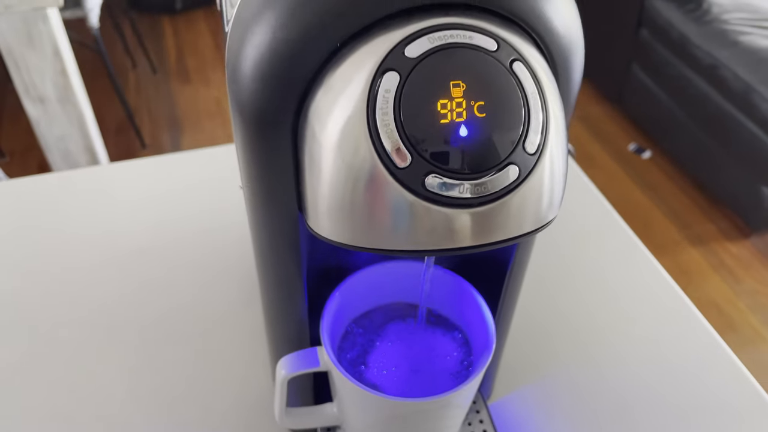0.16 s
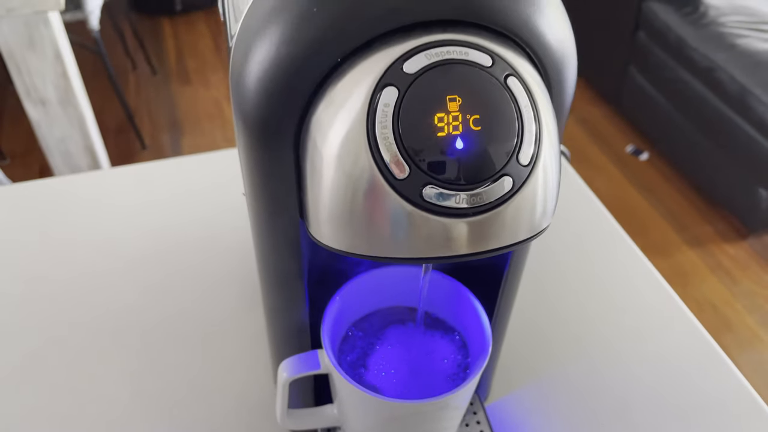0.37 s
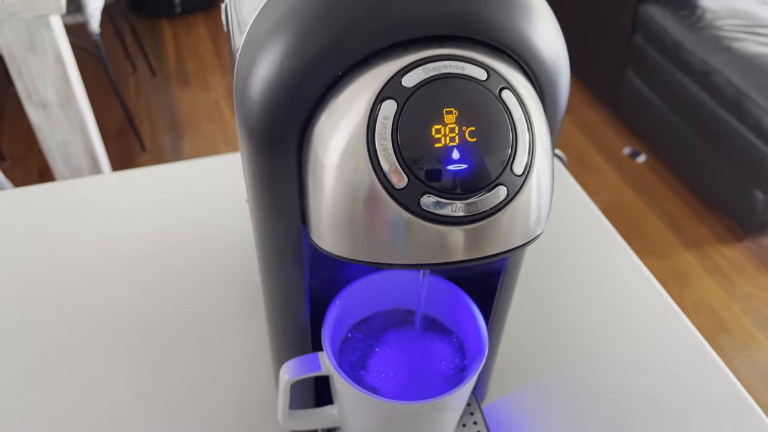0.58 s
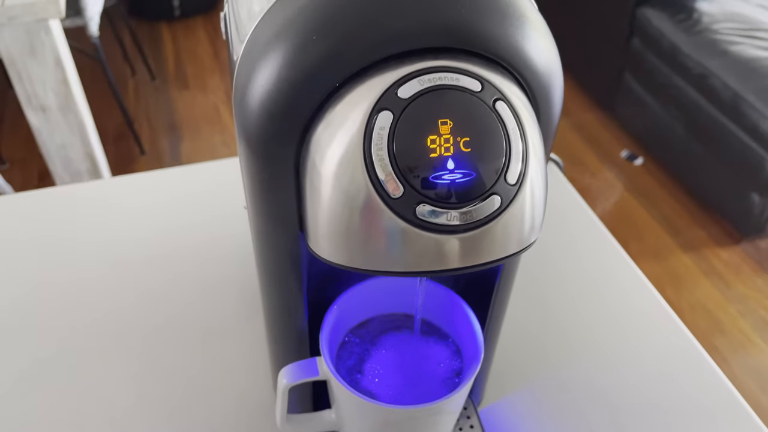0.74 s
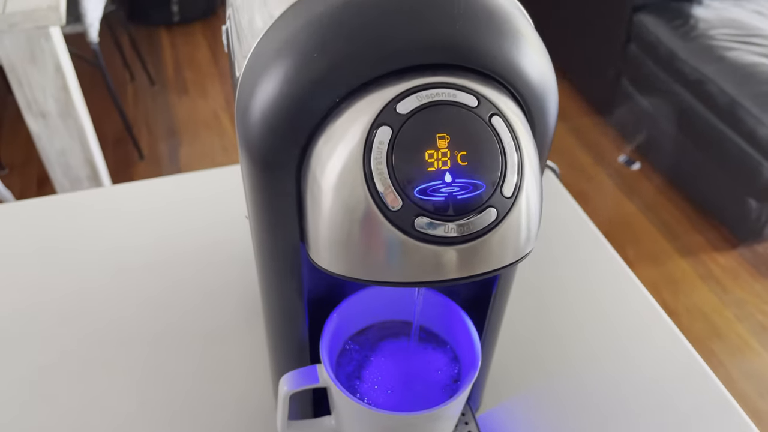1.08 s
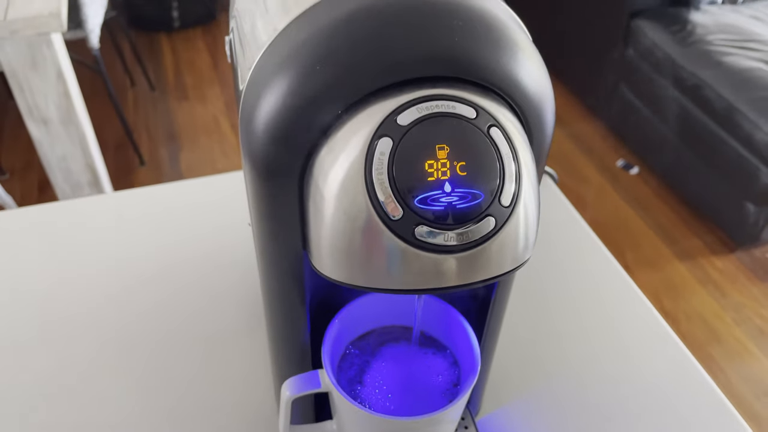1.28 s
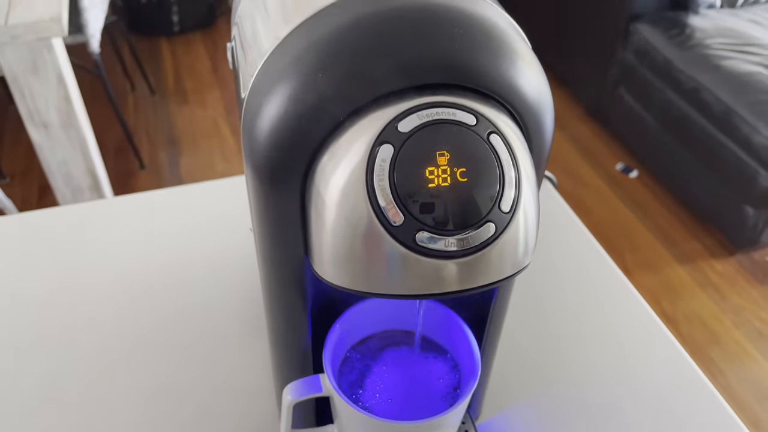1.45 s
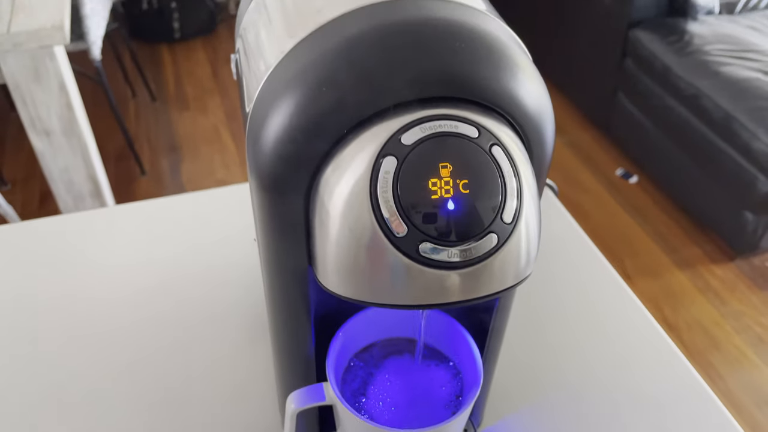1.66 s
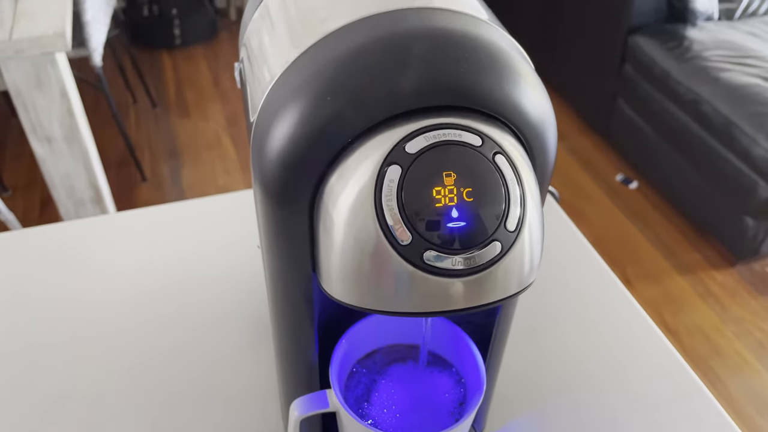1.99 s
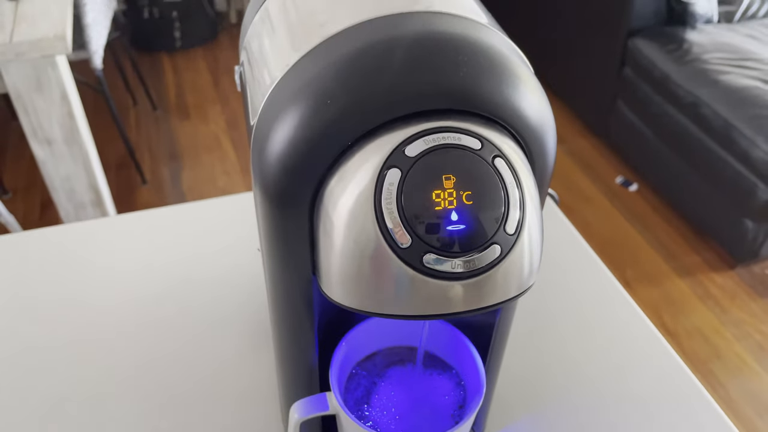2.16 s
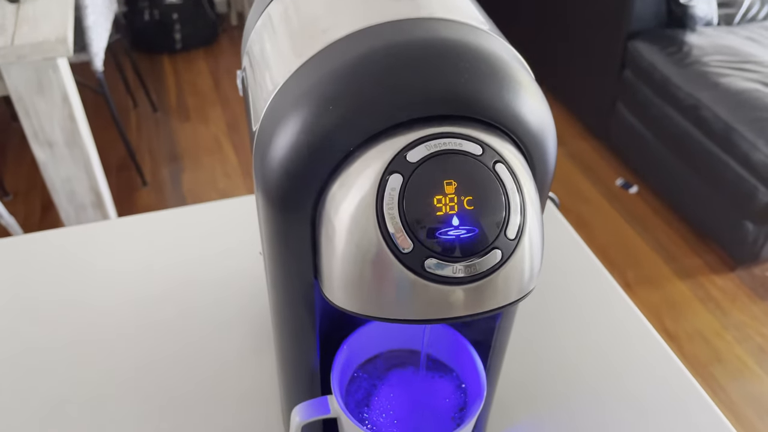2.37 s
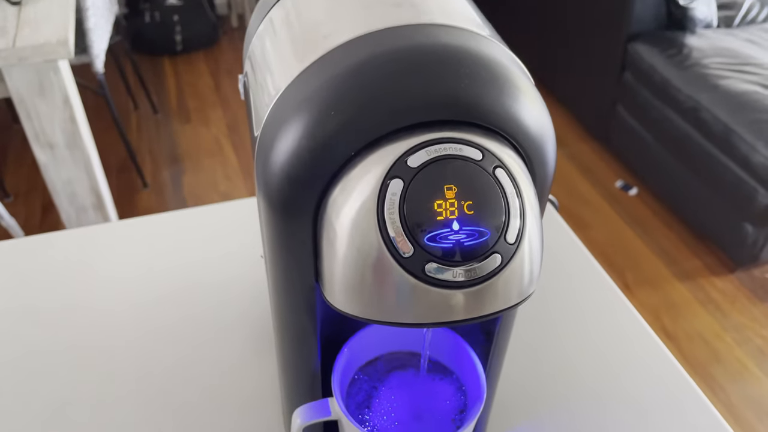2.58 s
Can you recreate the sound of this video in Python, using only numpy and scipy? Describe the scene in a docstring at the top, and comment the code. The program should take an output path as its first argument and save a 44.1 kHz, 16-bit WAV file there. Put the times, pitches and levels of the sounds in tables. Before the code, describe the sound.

A thin stream of hot water pours steadily into a part-filled mug, bubbling and gurgling with occasional hollow plops and crisp spits, over a low pump hum and heater rumble, close-miked in a small kitchen.

```python
"""A countertop dispenser pours a thin stream of hot water into a part-filled mug, close to the microphone.
From the start the heater rumbles, the stream rushes, the pump hums and swarms of tiny bubbles gurgle,
surging most near 0.2 s. Bubbles ring, plops sink in pitch and the spout spits sharp bursts of noise.
The heaviest plops fall near 0.65 and 0.72 s, as the pump hum is about to rise for half a second, and near
2.53 s. A small kitchen answers the bubbles and plops faintly with a short, diffuse tail."""
import sys
import numpy as np
from scipy import signal
from scipy.fft import rfft, irfft
from scipy.io import wavfile
from scipy.ndimage import uniform_filter1d

SR = 44100
rng = np.random.default_rng(int(sys.argv[2]) if len(sys.argv) > 2 else 0)


def store_wav(level_fs):
    """Save 16-bit WAV to argv[1]."""
    pcm = np.round(np.clip(np.atleast_2d(level_fs), -1, 1) * 32767)
    wavfile.write(sys.argv[1], SR, pcm.T.astype(np.int16))


N = 120834


def amp(db):
    """Decibels to gain."""
    return 10 ** (np.asarray(db) / 20)


def unit(x):
    """Scales to rms 1."""
    return x / np.sqrt(np.mean(x ** 2) + 1e-20)


def read(points, hz):
    """Reads a table along a log-frequency axis."""
    f, value = np.transpose(points)
    return np.interp(np.log(hz + 1), np.log(f + 1), value)


def over_time(points):
    """Draws a (seconds, value) table as a curve over the whole scene."""
    return np.interp(np.arange(N) / SR, *np.transpose(points))


def add(mix, s, sound):
    """Mixes a sound in at time s."""
    part = mix[max(round(s * SR), 0):][:len(sound)]
    part += sound[:len(part)]


def drift(rate_hz):
    """Random motion of rms 1, mostly slower than rate_hz."""
    hz = np.fft.rfftfreq(N, 1 / SR)
    spectrum = rfft(rng.standard_normal(N)) / (1 + (hz / rate_hz) ** 4)
    return unit(irfft(spectrum, N))


def band(noise, centre_hz, octaves):
    """Keeps a bell-shaped band of the noise, at rms 1."""
    hz = np.fft.rfftfreq(len(noise), 1 / SR)
    bell = np.exp(-.5 * (np.log2((hz + 1) / centre_hz) / octaves) ** 2)
    return unit(irfft(rfft(noise) * bell, len(noise)))


# Colour of heater rumble and stream rush. Each row: frequency in Hz, relative spectral level in dB.
RUSH_COLOUR = [(20, -30), (60, -1), (140, -3.5), (250, -1.5), (425, -11), (540, -10.5), (700, -15.5),
               (1000, -13), (1400, -20), (2100, -22.5), (3700, -30.5), (4650, -43), (5100, -37),
               (5900, -42), (7300, -35), (8200, -34.5), (10300, -44), (12500, -53), (16000, -45)]
# Resonances of the casing and the mug. Each row: frequency in Hz, width in Hz, boost in dB.
RESONANCES = [(498.4, 29, 11.5), (855, 27.4, 10.5), (1535, 54, 8), (1904, 27, 6.5), (2093, 24, 8.5)]
# How alike the rush is at the two microphone ports. Each row: frequency in Hz, likeness (1 is identical).
PORT_LIKENESS = [(60, 0.97), (300, .95), (700, 0.72), (1050, 0.66), (1800, 0.41), (3000, 0.64), (7000, 1),
                 (8200, 0.98)]
# Vigour of the gurgle, which the rush partly follows. Each row: time in seconds, level in dB.
VIGOUR = [(0, -2), (.21, 7.5), (.42, -2), (.75, 5.5), (1.15, 4), (1.55, 3.5), (2.35, 2.5), (2.74, 1.5)]
RUSH_DB, PATCH_DB, FLICKER_DB = -42.5, 1.55, 1.36
FLICKER_ABOVE_HZ, RUSH_FOLLOWS = 1750, 0.22  # RUSH_FOLLOWS: share of the vigour in dB


def rush():
    """Simmering rumble and the patchy rush of the stream, coloured by the casing and the mug."""
    frames, hz = N // 512 + 6, np.fft.rfftfreq(2048, 1 / SR)
    a, b, c, d, patches = rng.standard_normal(size=(5, frames, len(hz)))
    patches = uniform_filter1d(patches, size=4, axis=0)
    patches = unit(uniform_filter1d(patches, size=24, axis=1))
    likeness = np.clip(read(PORT_LIKENESS, hz), -1, 1)
    left = a + 1j * b
    right = likeness * left + np.sqrt(1 - likeness ** 2) * (c + 1j * d)
    grains = np.array([left, right]) * amp(PATCH_DB * patches)
    noise = signal.istft(grains.transpose(0, 2, 1), nperseg=2048, noverlap=1536)[1][:, :N]

    hz = np.fft.rfftfreq(N, 1 / SR)
    boosts_db = sum(db / (1 + (2 * (hz - f) / width) ** 2) for f, width, db in RESONANCES)
    spectrum = rfft(noise) * amp(read(RUSH_COLOUR, hz) + boosts_db)
    whole = irfft(spectrum, N)
    low = irfft(spectrum / (1 + (hz / FLICKER_ABOVE_HZ) ** 4), N)
    # Only the treble flickers and follows the vigour
    treble_db = RUSH_FOLLOWS * over_time(VIGOUR) + FLICKER_DB * drift(rate_hz=76)
    return amp(RUSH_DB) * unit(low + (whole - low) * amp(treble_db))


# Pump motor. Each row: time in seconds, speed in Hz before the waver, level in dB before the flutter.
PUMP = [(0, 63.58, -40), (.69, 63.33, -40), (0.831, 65.82, -38.5), (1.25, 65.56, -38.5),
        (1.43, 63.73, -39.5), (1.66, 62.86, -42.5), (2.1, 63.7, -39.5), (2.5, 63.5, -39.5)]
# Motor hum and gear tones. Each row: multiple of the pump speed, relative level in dB.
PUMP_ORDERS = [(1, -1), (1.6, -18), (2.15, -13.5), (4.4, -18.5)]
PUMP_WAVER, PUMP_FLUTTER_DB = 0.0176, 0.8  # waver: rms share of the speed


def pump():
    """A low motor hum with weak gear tones, all following the pump's speed."""
    s, hz, db = np.transpose(PUMP)
    t = np.arange(N) / SR
    speed_hz = np.interp(t, s, hz) * (1 + PUMP_WAVER * drift(rate_hz=14.2))
    turns = np.cumsum(speed_hz) / SR
    hum = sum(amp(order_db) * np.sin(2 * np.pi * (multiple * turns + rng.random()))
              for multiple, order_db in PUMP_ORDERS)
    level_db = np.interp(t, s, db) + PUMP_FLUTTER_DB * drift(rate_hz=4.2)
    return np.sqrt(2) * amp(level_db) * hum


BUBBLE_RISE_S, BUBBLE_SHAPE = .0005, 2.2  # a shape above 1 holds the ring, then drops it
POP_DB, POP_OCTAVES, POP_PER_RING = -8, 0.69, 0.79  # pop decay as a share of the ring time


def bubble(hz, ring_s, pop_hz, pop_db, noise):
    """Trapped air pinches off with a splashy pop and rings for a few cycles; hz may be a curve."""
    t = np.arange(len(noise)) / SR
    cycles = np.cumsum(hz * np.ones(len(t))) / SR
    tone = np.exp(-(t / ring_s) ** BUBBLE_SHAPE) * np.sin(2 * np.pi * cycles)
    pop = band(noise, pop_hz, POP_OCTAVES) * np.exp(-t / (POP_PER_RING * ring_s))
    return (1 - np.exp(-t / BUBBLE_RISE_S)) * (tone + amp(pop_db) * pop)


# Swarms of faint bubbles. Each row: bubbles per second, middle pitch in Hz, widest pitch spread either way
# in octaves, ring in seconds, level in dB of the faintest bubble before the vigour.
SWARMS = [(29.94, 242.2, 0.44, 0.016, -52), (69.97, 1042, 0.14, 0.0058, -56.5),
          (85, 1900, 0.33, 0.0032, -59), (89.6, 4450, .35, 0.0014, -60)]
SWARM_SPREAD_DB, SWARM_CAP = 3.3, 2.3  # mean extra level before the cap; the cap as a multiple of it
CLUSTER_DB, CLUSTER_HZ = 2.5, 9


def gurgle():
    """Swarms of faint bubbles, low simmer to fine fizz, in loose clusters that follow the stream's vigour."""
    out = np.zeros(N)
    for per_s, hz, octaves, ring_s, db in SWARMS:
        draws, noises = rng.random(size=(400, 3)), rng.standard_normal(size=(400, 2048))
        times = np.cumsum(-np.log(draws[:, 0])) / per_s
        extra_db = SWARM_SPREAD_DB * np.minimum(-np.log(draws[:, 1]), SWARM_CAP)
        spread = np.log(draws[:, 2] / (1 - draws[:, 2])).clip(-2, 2) / 2
        pitches = hz * 2 ** (octaves * spread)
        for s, size_db, pitch, noise in zip(times, extra_db, pitches, noises):
            if s < N / SR:
                add(out, s, amp(db + size_db) * bubble(pitch, ring_s, pitch, POP_DB, noise))
    clusters_db = CLUSTER_DB * np.tanh(drift(CLUSTER_HZ))
    return out * amp(over_time(VIGOUR) + clusters_db)


# Small bubbles and droplet ticks. Each row: start in seconds, ring level in dB, pitch in Hz.
BUBBLES = [(.041, -42.5, 4346), (.111, -37.5, 3530), (0.26, -49, 4100), (.275, -50, 4950),
           (.502, -47, 5360), (.645, -43, 4140), (0.6676, -37.5, 3270), (.6666, -34, 4480),
           (0.6667, -33, 6520), (.727, -39.5, 635), (.868, -48, 5000), (0.919, -35, 2070),
           (.933, -38, 2050), (1.0543, -45, 4250), (1.3125, -46, 5138), (1.3478, -39.5, 5000),
           (1.365, -35.5, 1890), (1.6394, -33.5, 5260), (1.7764, -41, 3260), (2.2126, -35, 3810),
           (2.215, -43, 5080), (2.2367, -34, 5170), (2.26, -37.5, 2090), (2.675, -41.5, 5400)]
BUBBLE_CYCLES = 8.5  # ring time in cycles of the pitch


def small_bubbles():
    """Small single bubbles that die the sooner the higher they ring."""
    out = np.zeros(N)
    for s, db, hz in BUBBLES:
        noise = rng.standard_normal(2048)
        add(out, s, amp(db) * bubble(hz, BUBBLE_CYCLES / hz, hz, POP_DB, noise))
    return out


# Plops of the stream plunging into the mug. Each row: start in seconds, ring level in dB, ring in seconds.
PLOPS = [(0.113, -31.5, 0.0028), (0.1736, -34, 0.01), (.196, -41.5, .006), (0.6455, -22.5, 0.0054),
         (.662, -36, .016), (.7242, -25, 0.0067), (0.7554, -31, 0.0079), (.9488, -32.5, 0.01),
         (0.971, -38, 0.0085), (1.084, -34.5, 0.003), (1.159, -35.5, 0.0042), (1.187, -36.5, 0.0057),
         (1.7635, -36.5, .0042), (2.2373, -33, 0.0044), (2.258, -38, 0.0073), (2.368, -37.5, 0.0045),
         (2.4526, -35.5, 0.0051), (2.5298, -24.5, 0.0037), (2.542, -37.5, 0.0046)]
PLOP_START_HZ, PLOP_END_HZ, PLOP_SINK_S = 1190, 961, 0.0033  # end pitch is for a plop of average dB
PLOP_DEEPER_HZ_PER_DB = 13.5
PLOP_SPLASH_HZ, PLOP_SPLASH_DB = 1290, -17  # splash relative to the ring


def plops():
    """Each plop sinks in pitch as its cavity deepens, the strong ones furthest."""
    out, t = np.zeros(N), np.arange(2048) / SR
    usual_db = np.mean(PLOPS, axis=0)[1]
    for s, db, ring_s in PLOPS:
        end_hz = PLOP_END_HZ - PLOP_DEEPER_HZ_PER_DB * (db - usual_db)
        sinking_hz = end_hz + (PLOP_START_HZ - end_hz) * np.exp(-t / PLOP_SINK_S)
        noise = rng.standard_normal(len(t))
        add(out, s, amp(db) * bubble(sinking_hz, ring_s, PLOP_SPLASH_HZ, PLOP_SPLASH_DB, noise))
    return out


# Spits of spray. Each row: start in seconds, level in dB, brightest frequency in Hz.
SPITS = [(.135, -43.5, 8700), (.614, -41, 5700), (.646, -38, 9300), (0.6662, -41, 5850), (.686, -47, 4940),
         (0.723, -46.5, 13000), (0.9188, -40.5, 8740), (1.126, -45.5, 6900), (1.601, -40, 7240),
         (1.6394, -41.5, 4700), (1.729, -42, 10600), (1.855, -46.5, 8740), (2.2124, -39.5, 4500),
         (2.2347, -35.5, 10500), (2.258, -45, 12000), (2.343, -50.5, 11800), (2.3675, -48.5, 11310),
         (2.5295, -47, 6100)]
SPIT_RISE_S, SPIT_DECAY_S, SPIT_OCTAVES = 0.00033, 0.0012, 0.48
SPIT_ECHO_S, SPIT_ECHO_DB = .0019, -15


def spits():
    """Each spit is a very short bright burst, thrown back once by the dispenser's recess."""
    out, t = np.zeros(N), np.arange(512) / SR
    shape = (1 - np.exp(-t / SPIT_RISE_S)) * np.exp(-t / SPIT_DECAY_S)
    strength = np.sqrt(SPIT_DECAY_S * SR / 2)  # gives every burst the same energy at 0 dB
    for s, db, centre_hz in SPITS:
        for delay, echo_db in ((0, 0), (SPIT_ECHO_S, SPIT_ECHO_DB)):
            burst = band(rng.standard_normal(len(t)), centre_hz, SPIT_OCTAVES) * shape
            add(out, s + delay, amp(db + echo_db) * burst * strength / np.linalg.norm(burst))
    return out


# Kitchen decay. Each row: frequency in Hz, time to fall 60 dB in seconds.
ROOM = [(200, 0.22), (2000, 0.1)]
ROOM_DB = -9


def kitchen(x):
    """A short diffuse tail, different at each port, the treble dying first."""
    hz, t, grains = signal.stft(rng.standard_normal(size=(2, SR // 2)), SR, nperseg=256)
    decay_db = -60 * t / read(ROOM, hz)[:, None]
    tail = signal.istft(grains * amp(decay_db), SR, nperseg=256)[1]
    return signal.fftconvolve(x[None], tail / np.linalg.norm(tail[0]), axes=1)[:, :N]


def scene():
    """The running machine, the dry ticks of spray, and the bubbles with their echo."""
    machine = rush() + pump()
    bubbles = gurgle() + small_bubbles() + plops()
    return machine + bubbles + spits() + amp(ROOM_DB) * kitchen(bubbles)


# Phase between the two microphone ports. Each row: frequency in Hz, lead of the left in radians.
PORT_PHASE = [(500, 0), (2100, .3), (3300, 1.35), (6100, .3), (7800, -3.05), (8700, -3.25), (10400, -5.2),
              (12900, -7.6), (14000, -9), (15700, -9.7)]
# Balance of the ports. Each row: frequency in Hz, left minus right in dB.
PORT_BALANCE = [(280, 1.2), (600, 0.7), (1100, 0.5), (1850, 5), (3500, 0), (5100, 4.5), (8000, -0.5)]
EDGE_HZ = 16300


def record(dry):
    """The two ports differ in level and phase; then a steep low-pass sets the band limit."""
    hz = np.fft.rfftfreq(N, 1 / SR)
    half = amp(read(PORT_BALANCE, hz) / 2) * np.exp(.5j * read(PORT_PHASE, hz))
    pair = irfft(rfft(dry) * np.array([half, 1 / half]), N)
    low_pass = signal.firwin(511, EDGE_HZ, window=("kaiser", 9), fs=SR)
    return signal.oaconvolve(pair, low_pass[None], "same")


dry = scene()
out = record(dry)
store_wav(out)
```